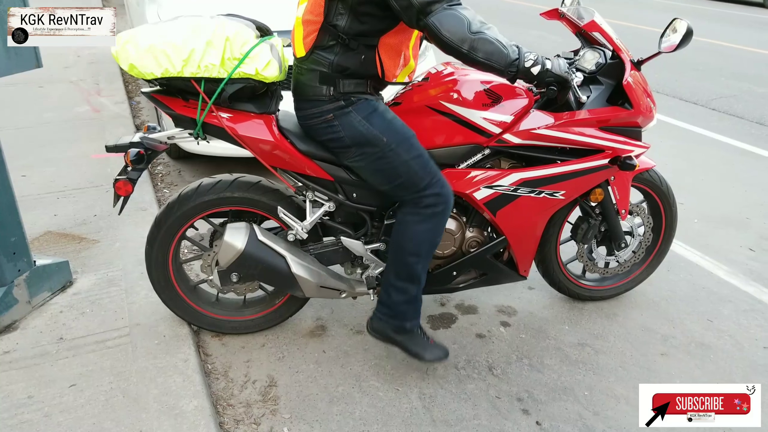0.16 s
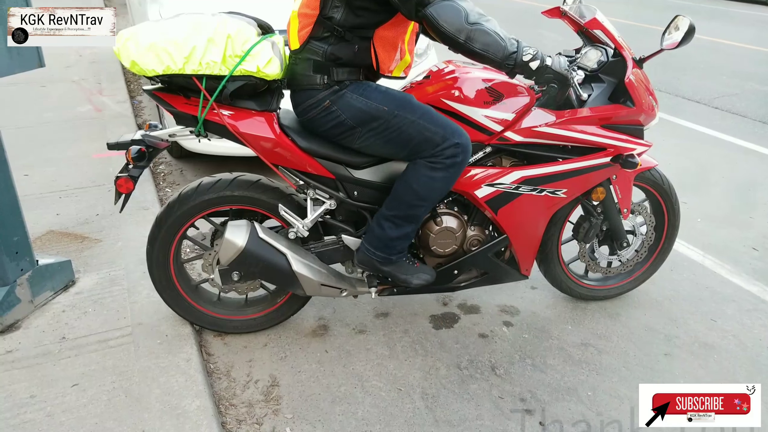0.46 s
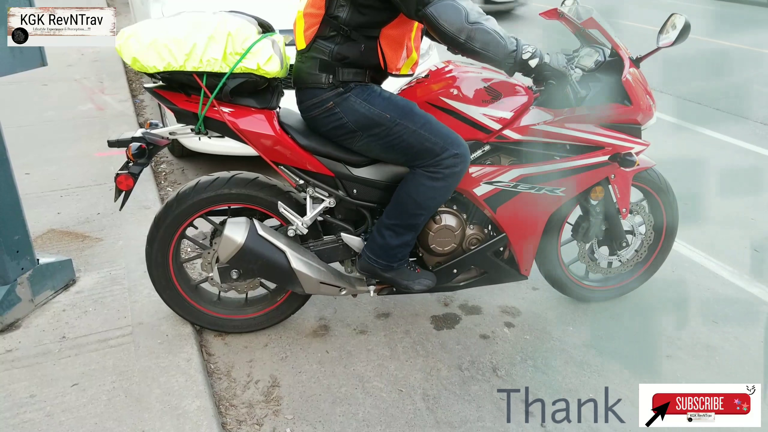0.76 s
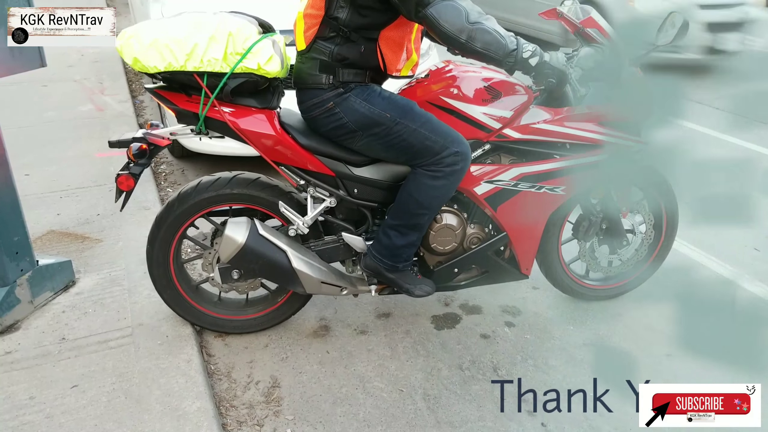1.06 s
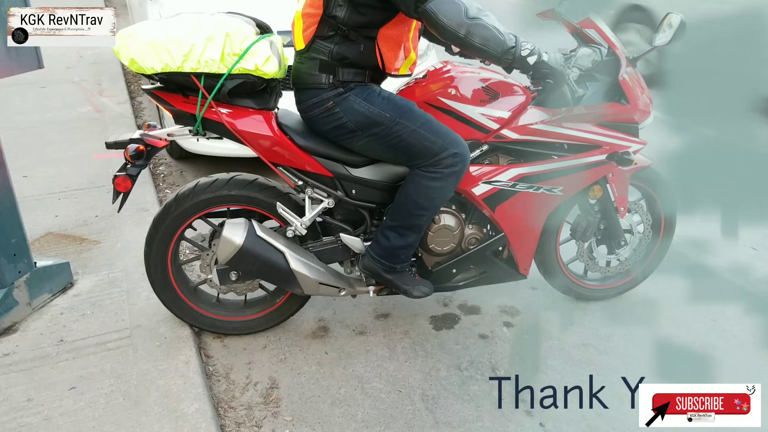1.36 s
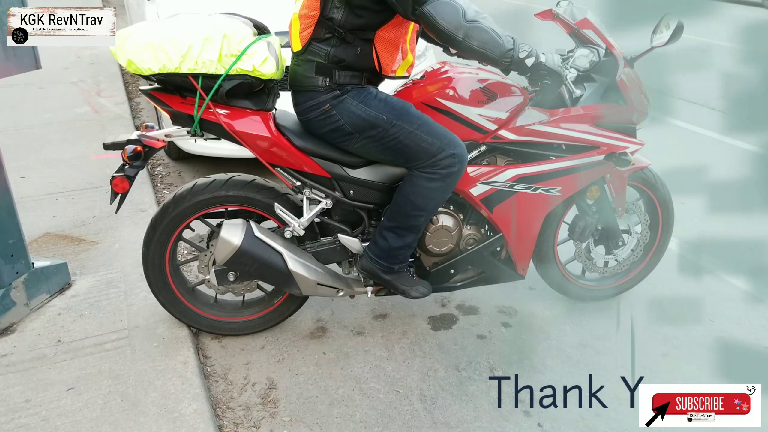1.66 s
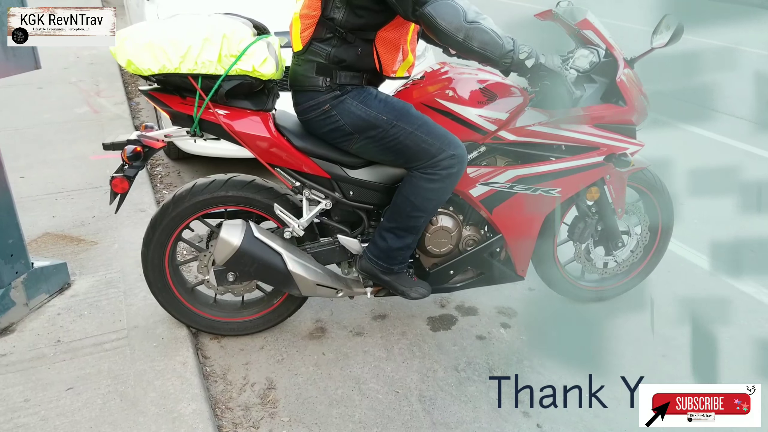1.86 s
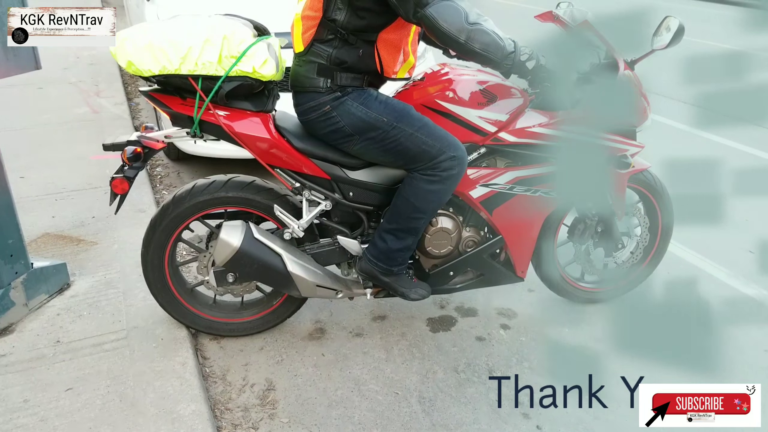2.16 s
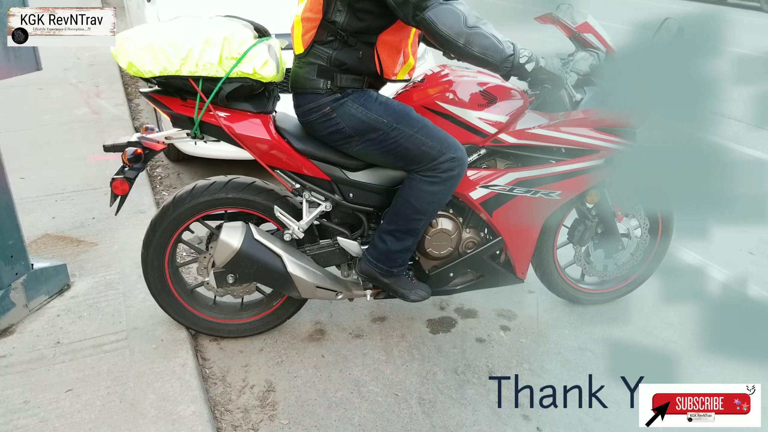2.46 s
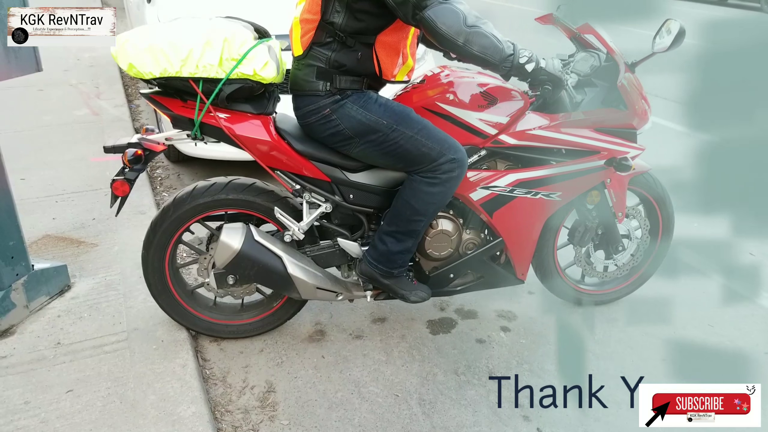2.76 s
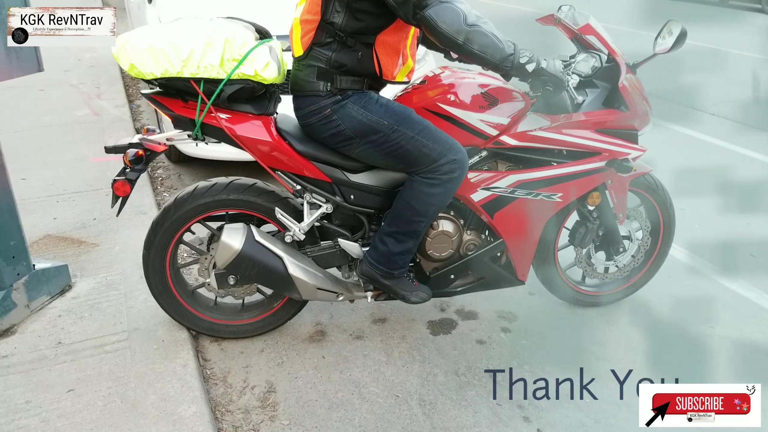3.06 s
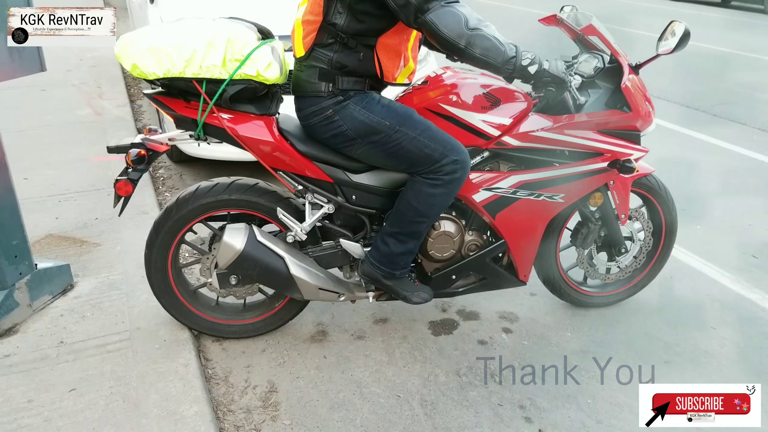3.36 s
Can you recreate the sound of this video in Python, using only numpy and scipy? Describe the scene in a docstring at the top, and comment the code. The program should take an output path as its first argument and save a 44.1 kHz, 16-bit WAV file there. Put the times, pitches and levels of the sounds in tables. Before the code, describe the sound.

A motorcycle idles close by with a deep, evenly pulsing exhaust and light engine ticking. On the street behind it, a car rolls past with a soft rush of tyres, then another approaches from far off.

```python
"""A parallel-twin motorcycle idles at the kerb. Its two cylinders fire a quarter of a cycle apart,
then coast; each exhaust pulse excites the damped resonances of the silencer. The valve gear ticks
and rustles in step with the crank. On the street behind, a car rolls past, its tyres roaring and
singing with a falling pitch, and another one approaches from afar."""
import sys
import numpy as np
from scipy import signal
from scipy.io import wavfile
from scipy.ndimage import uniform_filter1d, map_coordinates

SR = 44100
rng = np.random.default_rng(int(sys.argv[2]) if len(sys.argv) > 2 else 0)


def unload_audio(sound):
    """Save the sound as a 16-bit wav file, at the path given as the first command line argument."""
    columns = np.transpose(np.atleast_2d(sound))
    # keep every value between -1 and 1, then stretch to whole-number steps
    steps = np.round(np.clip(columns, -1, 1) * 32767)
    wavfile.write(sys.argv[1], SR, steps.astype(np.int16))


N = 154350
LEAD_S = .5  # the resonances build up before the sound begins
TIME = np.arange(-int(LEAD_S * SR), N) / SR


# exhaust pulses, two sharp firings then two soft piston pushes: cycle_phase, level_db, width_s, polarity
EXHAUST_PULSES = [(0, 0, 0.00044, 1), (.243, -1.5, 0.00094, 1), (0.399, -6.5, 0.0023, 1),
                  (0.506, -2.5, 0.0027, 1)]
# strength of the pulses over time: time_s, level_db
PULSE_STRENGTH = [(0, 0), (2.7, 0.13), (3.5, -1.5)]
# silencer modes: pitch_hz, level_db, t60_s, polarity
SILENCER_MODES = [(55.7, -28.5, 0.18, 1), (82.65, -16, 0.2, 1), (157.1, -24, 0.13, -1), (234, -36, 0.11, 1)]

def exhaust(cycle):
    """Impulse excitation: gas pulses ring the silencer; a wide pulse reaches only its low modes."""
    at, db, width_s, polarity = each_cycle(cycle, EXHAUST_PULSES, spread_db=.5, jitter_s=0.00012)
    db = db + in_time(PULSE_STRENGTH)[at]
    boom = 0
    for hz, mode_db, t60, sign in SILENCER_MODES:
        rolloff_db = 10 * np.log10(np.e) * (2 * np.pi * hz * width_s) ** 2  # Gaussian pulse spectrum
        spread_db = hz / 157.1  # higher modes vary more
        clicks = strike(at, db + mode_db - rolloff_db, spread_db, sign * polarity)
        boom = boom + ring(clicks, hz, t60)
    rumble_cut = signal.butter(3, 40.4, "high", fs=SR, output="sos")
    return signal.sosfiltfilt(rumble_cut, boom, padtype="constant")


# crank speed: time_s, speed_rpm
CRANK_SPEED = [(0.0, 1328.9), (0.194, 1320.6), (0.333, 1386.9), (0.814, 1345.9), (0.878, 1286.4),
               (1.058, 1329.7), (1.467, 1359.8), (1.658, 1315.4), (1.852, 1309.9), (2.128, 1372.6),
               (2.439, 1290.9), (2.524, 1349.4), (2.775, 1335.5), (2.836, 1308.8), (3.036, 1326.3),
               (3.237, 1217.6), (3.343, 1298.7), (3.5, 1338.5)]

def crank():
    """Phase as the integral of speed, in four-stroke cycles; cylinder one fires at whole numbers."""
    cycles = np.cumsum(in_time(CRANK_SPEED)) / (120 * SR)  # two revolutions per cycle
    first_firing_phase = .297
    return cycles - cycles[-N] - first_firing_phase


# valve and piston impacts: cycle_phase, level_db
IMPACTS = [(0.014, -5), (.09, -4.5), (.235, -3), (.44, -1.5), (.83, -1)]
# engine case modes: pitch_hz, level_db, t60_s
CASE_MODES = [(469, -50.5, 0.15), (544, -46, 0.083), (622.3, -47, 0.2), (781, -42, 0.15),
              (879, -40.5, 0.083), (1455, -47, 0.11), (3128, -50, 0.067), (4185, -53, .03),
              (7700, -51, 0.021)]

def engine_case(cycle):
    """Modal response: valves and pistons tap the case and the cam chain rubs it, unalike at each ear."""
    at, db = each_cycle(cycle, IMPACTS, spread_db=1.0, jitter_s=0.00037)
    chain = from_db(-32) * rng.standard_normal((2, len(TIME)))
    ears = np.zeros_like(chain)
    for ear, friction in zip(ears, chain):
        for k, (hz, mode_db, t60) in enumerate(CASE_MODES):
            force = strike(at, db, spread_db=3.5) + friction
            ear += (-1) ** k * from_db(mode_db) * ring(force, hz, t60)
    return ears


# swells of rustle as the cams lift: cycle_phase, width_cycles, level_db
CAM_LIFTS = [(1, 0.048, 5), (0.21, 0.056, 9), (0.35, 0.047, 5)]
# spectra of the valve rustle and of the chain and gear whirr: frequency_hz, density_db
RUSTLE_SPECTRUM = [(800, 7.5), (2000, 5), (3300, -3), (4300, -1), (6000, -4), (7900, -3.5), (8900, -13.5),
                   (11000, -6.5), (15500, -9)]
WHIRR_SPECTRUM = [(110, 0), (250, 0), (350, -5), (700, -7.5), (1200, -7.5), (1700, -12), (2600, -14),
                  (3400, -20.5), (4300, -17), (6000, -24), (7900, -27), (8900, -43), (11000, -27),
                  (15500, -32.5)]
# interaural correlation of the engine noise: frequency_hz, correlation
ENGINE_CORRELATION = [(250, 0.92), (500, 0.56), (900, 0.26), (1400, -0.35), (2000, 0.45), (4000, -0.33),
                      (12000, -0.075)]

def valve_gear(cycle):
    """Amplitude modulation: a gritty rustle swells with each cam lift over a steady whirr of gears."""
    power = 0
    for phase, width, db in CAM_LIFTS:
        turn, within = np.divmod(cycle - phase + .5, 1)
        uneven_db = 0.2 * rng.standard_normal(size=64)[turn.astype(int)]
        swell = np.exp(-.5 * ((within - .5) / width) ** 2)
        power = power + from_db(db + uneven_db) ** 2 * swell
    flutter = unit_rms(uniform_filter1d(rng.standard_normal(len(TIME)), size=40))
    grit = np.exp(0.099 * flutter)
    rustle = unit_rms(np.sqrt(power) * grit) * coloured_noise(RUSTLE_SPECTRUM, ENGINE_CORRELATION)
    whirr = coloured_noise(WHIRR_SPECTRUM, ENGINE_CORRELATION)
    return from_db(-43.5) * rustle + from_db(-34.5) * whirr


# spectra of the tyre roar, the hiss abreast and the rear tyres leaving: frequency_hz, density_db
ROAR_SPECTRUM = [(100, -3.5), (215, 2.5), (340, -5), (560, 3), (750, -1), (1000, 6), (1300, -4),
                 (3000, -20.5), (8000, -42)]
HISS_SPECTRUM = [(400, -7.5), (1000, -7), (1900, -4), (3200, -10.5), (4200, -6.5), (6000, -13.5),
                 (7800, -11.5), (9200, -29), (11000, -16), (15500, -21)]
REAR_SPECTRUM = [(700, -15), (1800, 6), (3100, -18), (4200, 2), (5600, -32)]
# envelopes of the same three noises: time_s, level_db
ROAR_LEVEL = [(0, -46.5), (.8, -39), (1.25, -29.5), (1.5, -30), (1.85, -33), (2.25, -42), (3.5, -76)]
HISS_LEVEL = [(0, -56), (.9, -50), (1.25, -39.5), (1.7, -40.5), (2.1, -48.5), (2.5, -81)]
REAR_LEVEL = [(1.45, -70), (1.78, -41), (2.35, -64)]
# falling song of the tread and rising hollow hum of the tyres: time_s, pitch_hz, level_db
TREAD_GLIDE = [(0, 1046, -52.5), (1, 1045, -45.5), (1.25, 960, -40), (1.45, 815, -38.5), (2, 780, -66)]
HUM_GLIDE = [(.4, 461, -70), (.72, 455, -41), (.92, 482.3, -56), (1.17, 524.3, -38.5), (1.47, 628, -38),
             (1.65, 640, -64)]
# interaural correlation of the street noise: frequency_hz, correlation
STREET_CORRELATION = [(450, 0.98), (950, -0.33), (1400, 0.39), (2200, -0.26), (4000, 0.16)]

def passing_car():
    """Rolling noise: the tyres radiate broadband roar and hiss and two narrow resonances."""
    roar = tyre_noise(ROAR_SPECTRUM, ROAR_LEVEL, scatter_db=-10.5)
    hiss = tyre_noise(HISS_SPECTRUM, HISS_LEVEL, scatter_db=5)
    leaving = from_db(in_time(REAR_LEVEL)) * coloured_noise(REAR_SPECTRUM, STREET_CORRELATION)
    song = tyre_tone(TREAD_GLIDE, width_hz=113)
    hum = tyre_tone(HUM_GLIDE, width_hz=103)
    return roar + hiss + leaving + song + hum


def tyre_noise(spectrum, envelope, scatter_db):
    """Direct and diffuse fields: noise from the car's bearing adds to its scatter off the street."""
    direct = at_bearing(unit_rms(coloured_noise(spectrum, STREET_CORRELATION)[0]))
    scatter = from_db(scatter_db) * coloured_noise(spectrum, STREET_CORRELATION)
    return from_db(in_time(envelope)) * unit_rms(direct + scatter)


def tyre_tone(glide, width_hz, scatter_db=-12):
    """Randomly driven resonance: a gliding band of tyre noise, direct and scattered off the street."""
    time_s, *columns = np.transpose(glide)
    hz, db = [np.interp(TIME, time_s, column) for column in columns]
    direct, *scatter = [narrow_noise(hz, width_hz) for _ in range(3)]
    return from_db(db) * unit_rms(at_bearing(direct) + from_db(scatter_db) * np.array(scatter))


# bearing of the car, as the delay at the left ear: time_s, lag_ms
LEFT_EAR_LAG = [(.65, -0.018), (1.1, 0.27), (1.5, 0.42), (2, 0.56)]

def at_bearing(source):
    """Interaural time difference: the car's sound reaches the farther ear later."""
    now = np.arange(len(TIME))
    lag = in_time(LEFT_EAR_LAG) * SR / 1000
    return np.array([map_coordinates(source, [now + side * lag / 2], order=3, mode="nearest")
                     for side in (-1, 1)])


# spectrum of far-off tyres: frequency_hz, density_db
DISTANT_SPECTRUM = [(310, -6.5), (450, 1.5), (630, -2.5), (1020, 2), (1250, -5), (1550, 0.5), (2500, -17.5),
                    (6000, -32)]
# envelope of their roar: time_s, level_db
DISTANT_LEVEL = [(0, -46), (.7, -36.5), (1.7, -42), (2.4, -52), (2.9, -44.5), (3.5, -35)]

def distant_cars():
    """Diffuse field: far-off tyres are heard only as a rush that swells and fades."""
    return from_db(in_time(DISTANT_LEVEL)) * coloured_noise(DISTANT_SPECTRUM, STREET_CORRELATION)


# interaural level difference of the noise: frequency_hz, left_minus_right_db
NOISE_BALANCE = [(100, 4.7), (500, -2), (1000, -1.5), (2000, 1.5), (4000, -1), (8000, -0.5), (12000, 1.5)]

def coloured_noise(spectrum, correlation):
    """Partial coherence: mid and side noise mix in quarter-octave bands to a set correlation; rms 1."""
    edges = np.geomspace(100, 16500, 31)
    noise, sides = 0, np.array([[1], [-1]])
    white = rng.standard_normal((2, 2, len(TIME)))
    for k, band in enumerate(zip(edges, edges[1:])):
        mid, side = signal.sosfilt(signal.butter(2, band, "band", fs=SR, output="sos"), white[k % 2])
        hz = np.sqrt(band[0] * band[1])
        alike = np.clip(at_hz(correlation, hz), -.99, .99)
        gain = from_db(at_hz(spectrum, hz) + sides * at_hz(NOISE_BALANCE, hz) / 2)
        noise = noise + gain * (np.sqrt(1 + alike) * mid + np.sqrt(1 - alike) * side * sides)
    return unit_rms(noise)


def narrow_noise(hz, width_hz):
    """Quadrature modulation: slow noise is shifted up to a moving centre frequency; rms 1."""
    lowpass = signal.butter(2, width_hz / 2, fs=SR, output="sos")
    slow = signal.sosfilt(lowpass, rng.standard_normal((2, len(TIME))))
    phase = 2 * np.pi * np.cumsum(hz) / SR
    return unit_rms(slow[0] * np.cos(phase) + slow[1] * np.sin(phase))


def each_cycle(cycle, rows, spread_db, jitter_s):
    """Quasi-periodicity: sample positions, levels and further columns of events that recur each cycle."""
    turns = range(int(cycle[0]), int(cycle[-1]) + 1)
    phase, db, *more = np.transpose([(turn + offset, *rest) for turn in turns for offset, *rest in rows])
    chance = rng.standard_normal((len(phase), 2))
    at = np.searchsorted(cycle, phase) + (jitter_s * SR * chance[:, 0]).astype(int)
    heard = (phase < cycle[-1]) & (at >= 0) & (at < len(TIME))
    return [column[heard] for column in (at, db + spread_db * chance[:, 1], *more)]


def strike(at, db, spread_db, polarity=1):
    """Impulse train with a random strength for each click."""
    clicks = np.zeros(len(TIME))
    uneven_db = spread_db * rng.standard_normal(len(TIME))[:len(at)]
    clicks[at] = np.sign(polarity) * from_db(db + uneven_db)
    return clicks


def ring(force, hz, t60):
    """Damped oscillator: a unit impulse starts a unit sine that falls 60 dB in t60 seconds."""
    decay = np.exp(-np.log(1000) / (t60 * SR))
    step = 2 * np.pi * hz / SR
    return signal.lfilter([0, np.sin(step)], [1, -2 * decay * np.cos(step), decay ** 2], force + 1e-18)


def from_db(db):
    """Decibels to amplitude ratio."""
    return 10 ** (np.asarray(db) / 20)


def unit_rms(x):
    """Normalisation to unit power."""
    return x / np.sqrt(np.mean(x ** 2) + 1e-20)


def in_time(rows):
    """Linear interpolation of a control curve at every sample."""
    return np.interp(TIME, *np.transpose(rows))


def at_hz(points, hz):
    """Interpolation on a log-frequency axis."""
    frequency, value = np.transpose(points)
    return np.interp(np.log(hz), np.log(frequency), value)


def scene():
    """Superposition: the idling motorcycle adds to the traffic behind it."""
    cycle = crank()
    motorcycle = exhaust(cycle) + engine_case(cycle) + valve_gear(cycle)
    street = distant_cars() + passing_car()
    return (motorcycle + street)[:, -N:]


def record(dry, cutoff_hz=15600):
    """Band limiting: a steep low-pass filter removes the highest treble."""
    return signal.sosfilt(signal.ellip(12, .1, 90, cutoff_hz, fs=SR, output="sos"), dry)


dry = scene()
out = record(dry)
unload_audio(out)
```